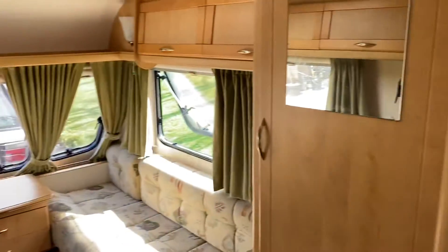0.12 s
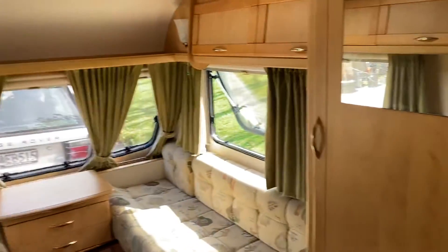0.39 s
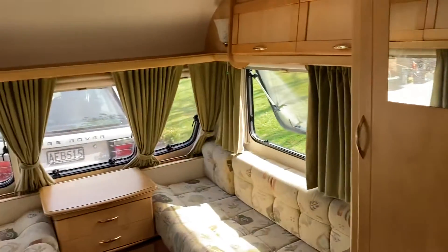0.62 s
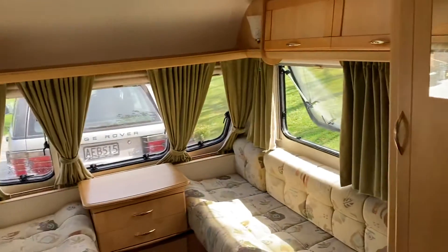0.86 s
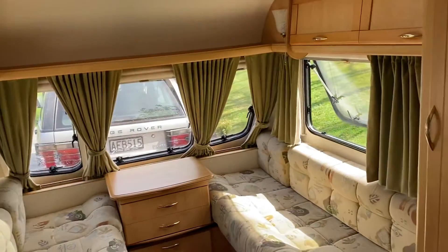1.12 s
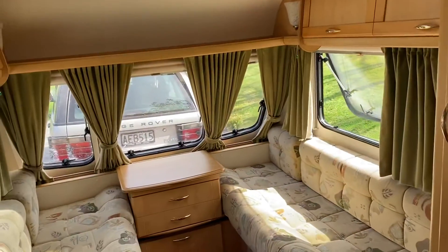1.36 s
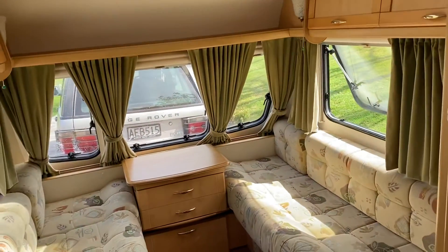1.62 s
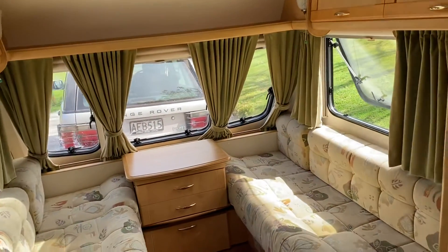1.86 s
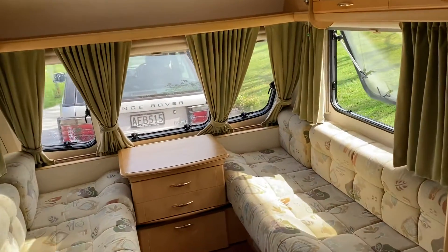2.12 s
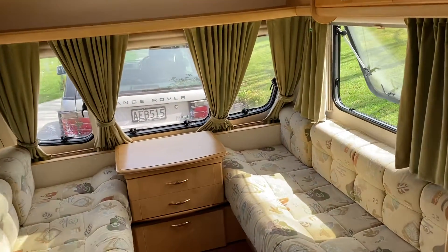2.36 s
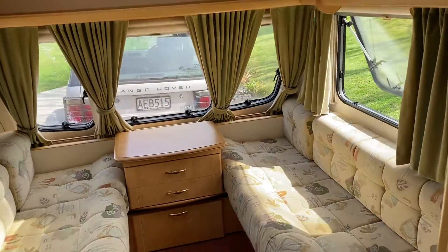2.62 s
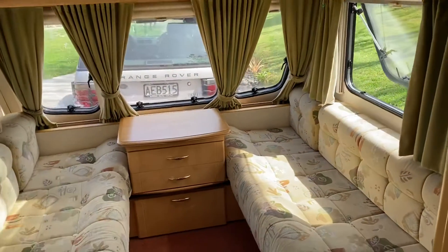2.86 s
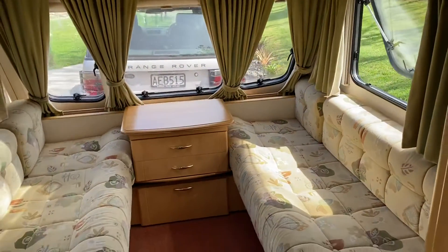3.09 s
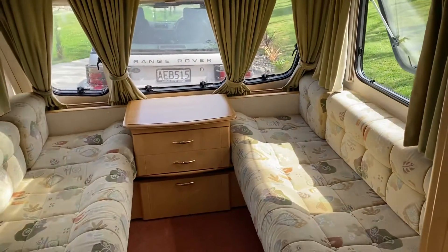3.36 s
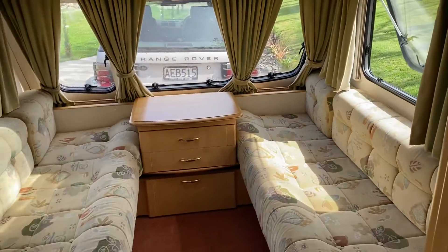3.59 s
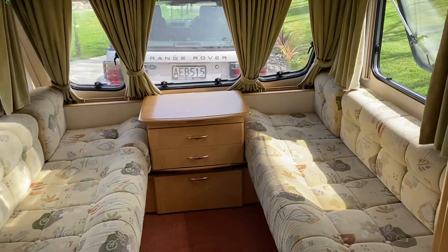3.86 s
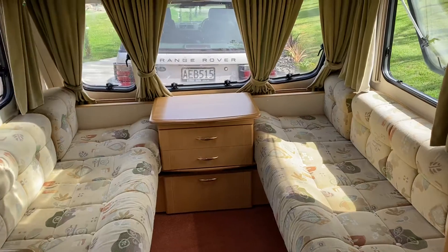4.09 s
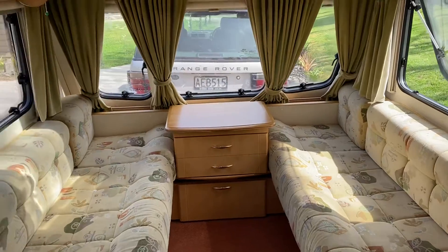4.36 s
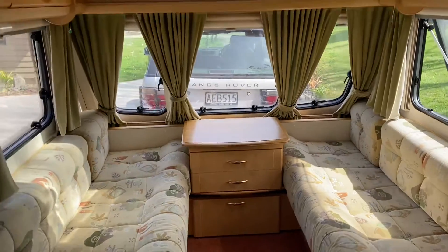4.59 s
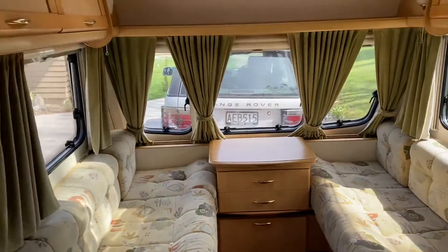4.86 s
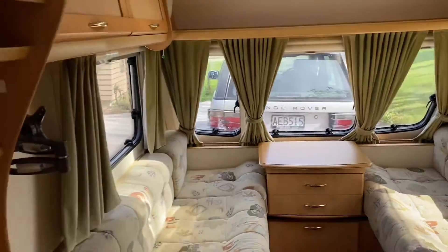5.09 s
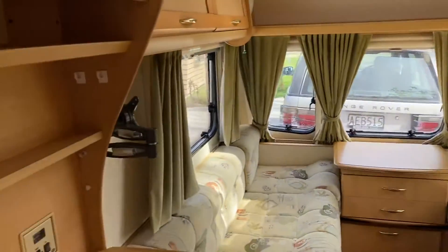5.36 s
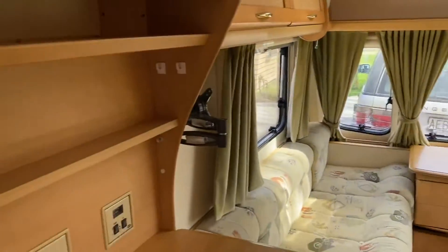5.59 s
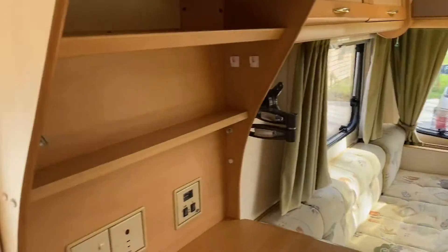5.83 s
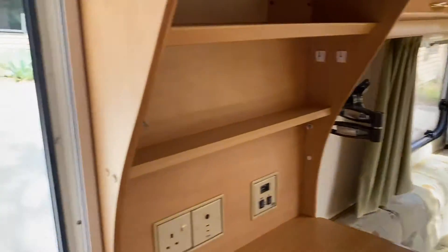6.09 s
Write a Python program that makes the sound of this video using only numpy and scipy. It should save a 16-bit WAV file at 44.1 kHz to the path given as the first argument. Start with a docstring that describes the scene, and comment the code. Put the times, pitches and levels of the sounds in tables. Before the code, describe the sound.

Close stereo microphone inside a small caravan. Light footsteps and small taps come first, with a few sharp latch clicks. Just before three seconds a light wooden door bangs shut, loud and hollow with a low thump. Bumps and rattles follow, then a second, weaker double knock about a second later and a few clicks. It settles to faint shuffling, two small taps, low outdoor rumble and a thin distant bird.

```python
"""You hear someone walk about in a small panelled caravan, shut a light door and work its latch.
Knocks and steps are bursts of rough force ringing tuned wood and panel modes; ticks are short decaying tones.
Cloth, soles and shuffling are coloured noise that follows the movement, with tiny contacts in the panels.
Outdoor rumble is low noise that booms in the cabin, over a faint hum; the bird is thin gliding tones.
Heavier blows add damped low swings, and short feedback delays make the cabin echo."""
import sys
import numpy as np
from scipy import signal
from scipy.fft import rfft, irfft, next_fast_len
from scipy.io import wavfile

SR = 44100
rng = np.random.default_rng(int(sys.argv[2]) if len(sys.argv) > 2 else 0)


def file_out(sig):
    """Save sig as 16-bit WAV at sys.argv[1]."""
    # one column per channel
    cols = np.atleast_2d(sig).T
    # limit, then scale
    lim = np.clip(cols, -1, 1)
    pcm = np.round(lim * 32767).astype(np.int16)
    wavfile.write(sys.argv[1], SR, pcm)


def amplitude_ratio(level_db):
    """Convert a level in decibels to the matching linear amplitude (field) ratio."""
    exponent = np.asarray(level_db, float) / 20
    return 10 ** exponent


N = 274071  # length in samples

# All spectra below give only the shape; the sound's own level sets the loudness.
# Shuffling, sole scuffs and cloth. Each row: pitch in Hz, level per Hz in dB.
SHUFFLE_SPECTRUM = [(180, -33), (300, -2.5), (982, -9), (1110, -7.5), (1420, -10.5), (1540, -11.5),
                    (3010, -29.5), (7000, -36), (9100, -67), (15400, -120)]
SCUFF_SPECTRUM = [(900, -28), (1600, -0.5), (2500, -2), (3600, -1.5), (5000, -5.5), (8000, -26.5)]
CLOTH_SPECTRUM = [(1200, -35), (2000, -7.5), (3500, -6), (5500, 1.5), (7000, -2), (9000, -1.5), (12000, -8),
                  (13000, -12), (15600, -7.5), (16000, -33)]
# Movement in the cabin. Each row: time in seconds, shuffle in dB, sole scuff in dB, cloth hiss in dB.
MOVEMENT_LEVELS = [(0, -69.5, -79.5, -94), (.3, -78, -81, -91), (.6, -65, -76, -91),
                   (.95, -67.5, -81, -78.5), (1.15, -82, -78, -101), (1.35, -59, -63.5, -75),
                   (1.55, -62, -68, -68.5), (1.85, -64.5, -70, -58.5), (2.1, -64.5, -69, -69.5),
                   (2.34, -65.5, -65.5, -60.5), (2.48, -69, -69.5, -70.5), (2.58, -64.5, -72, -81),
                   (2.7, -68, -67, -75), (3.05, -48, -61, -59.5), (3.24, -72, -81, -78.5),
                   (3.45, -53.5, -74, -84), (3.8, -54.5, -69, -75), (4.17, -62, -61, -65),
                   (4.3, -70, -78.5, -79.5), (5.03, -65, -78.5, -83.5), (5.065, -56, -70, -82),
                   (5.17, -54, -62, -91), (5.3, -61, -79, -88), (5.7, -67.5, -83, -88.5),
                   (6.21, -61, -68, -80)]
# Outdoor rumble. Each row: time in seconds, cabin boom in dB, drone in dB.
RUMBLE_LEVELS = [(0, -46.5, -57.5), (1.1, -46, -57), (1.3, -44, -52.5), (1.69, -48, -55.5),
                 (2.02, -43.5, -58), (2.3, -50.5, -59), (2.8, -44, -55), (4.3, -43, -57.5),
                 (4.67, -44.5, -55.5), (5.07, -44, -59), (5.59, -41, -54.5), (6.21, -42.5, -52.5)]
# Boom and drone. Each row: pitch in Hz, level per Hz in dB.
BOOM_SPECTRUM = [(13, -63.5), (22, -47.5), (27, -30.5), (41, -12.5), (64, 0.5), (79, -2), (103, -19),
                 (130, -18.5), (200, -41), (260, -64), (440, -120)]
DRONE_SPECTRUM = [(59, -23), (100, 1), (128, 1), (151, -5.5), (248, -10), (271, -12.5), (445, -15),
                  (592, -11), (1010, -22), (1390, -35), (3320, -57), (4730, -42), (7000, -67), (9100, -81),
                  (15400, -120)]
# A faint machine far off. Its one row: pitch in Hz, width in Hz, level in dB.
HUM_BAND = [(248, 13, -69.5)]
# Bird notes. Each row: start in seconds, length in seconds, first Hz, last Hz, level in dB before a shared trim.
BIRD_NOTES = [(0.188, 0.2, 5350, 5250, -81), (0.328, 0.43, 4580, 4770, -78), (.02, 0.14, 3650, 3600, -81),
              (0.444, 0.28, 3550, 3500, -81), (.84, 0.15, 4670, 4520, -75.5), (4.3, 0.14, 4630, 4550, -81),
              (4.62, 0.24, 4700, 4700, -74.5), (4.88, 0.57, 4570, 4580, -75),
              (5.15, 0.055, 4700, 4740, -81), (5.293, 0.052, 4800, 4780, -85),
              (5.418, 0.15, 4670, 4760, -82), (2.276, .1, 2950, 2980, -67), (2.36, 0.15, 3950, 3900, -70.5),
              (5.615, 0.2, 4750, 4360, -71.5), (5.74, 0.21, 4060, 3740, -75.5),
              (5.66, 0.12, 7100, 7000, -85), (5.925, 0.17, 4720, 4670, -75)]
# Knocks and steps. Each row: start in seconds, panel level in dB, pitch in Hz that the place of the blow
# favours, wood level in dB, crack level in dB, rattle decay by 60 dB in seconds.
# Each layer trims its level and divides the decay time.
BLOWS = [(0.265, -53, 708, -66, -66.5, 0.14), (0.459, -50, 725, -54, -62.5, 0.15),
         (0.786, -52, 1320, -56.5, -80, 0.18), (1.098, -43, 700, -51, -54, 0.43),
         (1.117, -41, 700, -34.5, -42, 0.11), (1.195, -42, 840, -52.5, -53.5, 0.2),
         (1.223, -42, 1070, -38, -67, 0.14), (1.279, -44, 1240, -51, -51.5, 0.28),
         (1.309, -50, 735, -50, -75, .1), (1.406, -40, 3180, -41, -45, 0.11),
         (1.495, -30, 2930, -41.5, -40.5, 0.078), (1.838, -45, 813, -58, -64, 0.086),
         (2.069, -53, 2820, -53.5, -46, 0.048), (2.156, -39, 2940, -58.5, -38, 0.16),
         (2.51, -43.5, 1340, -57, -65, 0.23), (2.798, -48.5, 1620, -60, -57.5, .33),
         (2.858, -45.5, 1080, -43.5, -77.5, 0.28), (2.886, -32, 1210, -32.5, -57, 0.095),
         (2.905, -20.5, 1340, -22, -46, .081), (2.91, -8, 1650, -15.5, -27, .1),
         (2.959, -21, 1530, -27.5, -40.5, 0.22), (2.995, -18, 1090, -34.5, -53, 0.077),
         (3.047, -28, 1120, -42.5, -70.5, .12), (3.075, -40, 1110, -49.5, -60, .33),
         (3.136, -34, 1170, -48.5, -70.5, 0.087), (3.203, -40.5, 1200, -45.5, -61.5, .099),
         (3.296, -43.5, 1700, -60, -68.5, 0.047), (3.349, -44.5, 1250, -45.5, -77, 0.08),
         (3.382, -32, 1460, -46, -53, 0.048), (3.443, -39, 1200, -31, -69, .11),
         (3.489, -39.5, 1100, -50.5, -63, 0.53), (3.561, -35, 1140, -52, -71, 0.24),
         (3.678, -38, 1150, -45, -64, 0.65), (3.713, -29.5, 1190, -34, -42, 0.21),
         (3.748, -45, 843, -46, -57, 0.054), (3.796, -46, 1660, -49.5, -52, 0.14),
         (3.861, -44.5, 1590, -44, -48.5, 0.11), (3.906, -17, 1200, -30, -34, 0.1),
         (3.915, -19.5, 1160, -19.5, -30.5, 0.12), (3.957, -40, 820, -38, -45, .14),
         (4.008, -34, 1110, -43, -66, .072), (4.082, -29, 1250, -41.5, -39, 0.17),
         (4.132, -26, 1460, -27, -35.5, .11), (4.189, -35, 1480, -60, -52.5, .054),
         (4.214, -39.5, 1450, -56, -53.5, 0.1), (4.535, -59, 1306, -75, -65, .08),
         (4.572, -56, 810, -52.5, -74, .085), (4.798, -33, 810, -36.5, -41.5, 0.084),
         (5.363, -28.5, 1713, -34.5, -38, 0.047)]
# Ringing of the door leaf. Each row: pitch in Hz, relative level in dB, decay by 60 dB in seconds.
WOOD_MODES = [(192.6, 5.5, 0.034), (237.6, -4, 0.067), (272.3, -1.5, 0.082), (332.3, 1.5, 0.081),
              (382.8, -3, 0.1), (423, -4, 0.091), (448, -2.5, 0.041), (519, -6, 0.044), (576, -4, 0.061),
              (700, -8.5, 0.043)]
# Ringing of thin panels and latch. Each row: pitch in Hz, relative level in dB, decay by 60 dB in seconds.
PANEL_MODES = [(767, 2, 0.066), (813, 1, 0.086), (990, 0, 0.017), (1070, 3, 0.077), (1200, 6, 0.013),
               (1320, 0.5, 0.057), (1460, 4.5, 0.023), (1590, 2.5, 0.066), (1680, 1.5, 0.027),
               (1960, -2, 0.014), (2004, -3.5, 0.18), (2310, -3.5, 0.029), (2430, -9, 0.022),
               (2620, -10, 0.086), (3016, -16, 0.025), (3255, -16, 0.01), (3600, -12.5, 0.039),
               (3950, -32, .025)]
# Crack of the knocks and sizzle of the ticks. Each row: pitch in Hz, level per Hz in dB.
CRACK_SPECTRUM = [(1500, -4.5), (2500, -1), (3600, -2), (5000, -6.5), (7000, -16), (9000, -18.5),
                  (12000, -48)]
SIZZLE_SPECTRUM = [(5000, -11.5), (8000, 0), (10000, -2.5), (12000, -4), (13500, -12.5), (15500, -18),
                   (16200, -33.5)]
# Hard ticks of latch and catches. Each row: start in seconds, level in dB before the trims of ring and snap,
# ring pitch in Hz, sizzle level in dB.
LATCH_TICKS = [(0.4603, -47.5, 5200, -67), (0.7826, -54, 3570, -92), (0.909, -53, 5000, -65),
               (1.117, -45, 2800, -53), (1.28, -37, 3000, -60), (1.406, -36, 3260, -61),
               (1.499, -25, 2770, -46.5), (2.07, -43.5, 2860, -74), (2.1565, -25.5, 2860, -52.5),
               (2.9044, -22.5, 2200, -36.5), (2.9118, -14, 2680, -41), (2.9164, -19.5, 2310, -51),
               (3.0465, -40.5, 2430, -54), (3.2046, -42, 2430, -59.5), (3.3498, -54, 9800, -70),
               (3.3847, -45, 6250, -75), (3.4476, -53, 6410, -61.5), (3.5389, -44.5, 6000, -80),
               (3.5608, -49, 6140, -80), (3.6775, -47.5, 6150, -65), (3.715, -28.5, 2830, -41.5),
               (3.8626, -38, 3770, -59), (3.891, -34.5, 10540, -44), (3.9089, -25.5, 2310, -43.5),
               (3.9393, -26.5, 2560, -35.5), (3.9588, -35.5, 2260, -39.5), (4.0074, -41, 2820, -59),
               (4.0836, -22, 2650, -46.5), (4.137, -27.5, 3750, -46), (4.5316, -45, 6600, -59.5),
               (4.797, -36.5, 2530, -47.5), (5.3642, -38, 2910, -44)]
# Damped swings of floor, shell and hollow boards. Each row: start in seconds, level in dB before a shared
# trim, pitch in Hz, decay by 60 dB in seconds.
LOW_SWINGS = [(1.116, -36, 165, 0.13), (1.128, -24.5, 87.8, 0.22), (1.5, -36.5, 479, .05),
              (2, -34, 64, 0.41), (2.167, -38, 172, 0.13), (2.918, -17.5, 141.7, 0.2),
              (2.929, -9.5, 55.7, 0.14), (2.972, -20, 164.7, 0.13), (3.24, -29, 63.6, .2),
              (3.459, -26.5, 65.1, 0.43), (3.491, -32.5, 108.5, 0.17), (3.741, -30, 195.5, .17),
              (3.914, -20, 132, 0.17), (3.921, -16, 57.1, 0.19), (3.986, -31.5, 44.6, 0.38),
              (4.138, -32.5, 150.2, 0.18), (4.803, -39.5, 332, 0.068), (5.365, -36.5, 470, 0.053),
              (5.372, -37, 71.3, 0.2)]
# How alike left and right are in the noises. Each row: pitch in Hz, likeness from -1 to 1.
SIDE_LIKENESS = [(60, 1), (180, 0.83), (550, 0.26), (1650, 0.043), (4970, 0.35), (15000, 0.71)]
# Near sounds at the two ports. Each row: pitch in Hz, radians by which left leads.
PORT_LEAD = [(0, 0.37), (700, -1.15), (1900, -0.45), (3300, 2), (4200, 0.95), (5000, 2), (6500, -0.96)]
# Microphone hiss. Each row: pitch in Hz, level per Hz in dB.
HISS_SPECTRUM = [(5000, -47), (7000, -6.5), (9000, -15), (11500, -22), (13000, -1.5), (14000, 5),
                 (15600, 1), (16000, -37)]

HISS_DB = -77.5
PATTER_PER_S, PATTER_DB, PATTER_SPREAD_DB = 120, -8.5, 4.0  # level is against the shuffle
# left-right balance while walking and at the door, its scatter from blow to blow, and that of the ticks
WALK_PAN_DB, DOOR_PAN_DB, PAN_SCATTER_DB, TICK_PAN_DB = -1, -3, 1.5, 2
DOOR_FROM_S, DOOR_UNTIL_S = 2.4, 4.05
TICK_T60_S, SNAP_T60_S = 0.011, 0.0036
SIZZLE_T60_S, SIZZLE_TAIL_DB, SIZZLE_TAIL_T60_S = 0.033, -14.5, 0.16
THUD_RISE_SHARE = 0.045  # rise time as a share of the decay time
# heavy blows shake the shell, whose rumble joins the boom and the drone
SHAKE_BOOM_DB, SHAKE_DRONE_DB, SHAKE_T60_S, SHAKE_RISE_S, SHELL_BELOW_HZ = -16.5, -26.5, 0.61, 0.03, 80
CABIN_T60_S, CABIN_DB, CABIN_FROM_HZ, WALL_CUT_HZ = 0.19, -13.5, 180, 13600
SHARED_FROM_HZ, SHARED_BY_HZ, TURN_FROM_HZ, TURN_HZ, TOP_HZ = 6200, 8200, 6500, 3750, 16300


def rms_one(x):
    """Scale to an average strength (rms) of 1."""
    return x / np.sqrt(np.mean(x ** 2) + 1e-20)


def pan(balance_db):
    """Left and right gains for a balance in dB; positive leans left."""
    return amplitude_ratio([[balance_db / 2], [-balance_db / 2]])


def in_time(rows):
    """Read each column of a timed table at every sample."""
    s, *columns = np.transpose(rows)
    return [np.interp(np.arange(N) / SR, s, column) for column in columns]


def at_hz(points, hz):
    """Read a spectrum on a logarithmic pitch axis."""
    table_hz, values = np.transpose(points)
    return np.interp(np.log(hz), np.log(table_hz), values)


def drift(rate_hz):
    """Slow random wandering with spread 1: white noise smoothed twice, at one value per 40 samples."""
    r = np.exp(-80 * np.pi * rate_hz / SR)
    white = rng.standard_normal(N // 40 + 2002)
    slow = signal.lfilter([1], [1, -2 * r, r * r], white)[2000:]  # drop the settling-in
    return np.interp(np.arange(N) / 40, np.arange(len(slow)), rms_one(slow - slow.mean()))


def colour(x, spectrum):
    """Filter white sound to a spectrum, keeping its power."""
    size = next_fast_len(N)
    gain = amplitude_ratio(at_hz(spectrum, np.fft.rfftfreq(size, 1 / SR) + 1))
    return irfft(rfft(x, size) * rms_one(gain), size)[..., :N]


def noise(spectrum):
    """Stereo noise of rms 1: a shared part and an opposed part, mixed to the likeness of each pitch."""
    size = next_fast_len(N)
    hz = np.fft.rfftfreq(size, 1 / SR) + 1
    alike = np.clip(at_hz(SIDE_LIKENESS, hz), -.99, .99)
    mid, side = rfft(rng.standard_normal((2, size)))
    both = np.sqrt(1 + alike) * mid + np.sqrt(1 - alike) * side * [[1], [-1]]
    return rms_one(irfft(both * amplitude_ratio(at_hz(spectrum, hz)), size)[:, :N])


def ring(forces, modes):
    """Each mode is a resonator that rings with its own share of the force, signs alternating."""
    out = 0
    for k, ((hz, level_db, t60), force) in enumerate(zip(modes, forces)):
        r = amplitude_ratio(-60 / (max(t60, .005) * SR))
        w = 2 * np.pi * hz / SR
        even = np.sqrt(4 * (1 - r) / len(modes))  # evens out long and short modes
        rung = signal.lfilter([0, np.sin(w)], [1, -2 * r * np.cos(w), r * r], force + 1e-18)
        out = out + (-1) ** k * even * amplitude_ratio(level_db) * rung
    return out


def rattle(s, level_db, t60, pan_db, rise_s):
    """Strength of all contacts over time: each rises quickly, then dies away, panned."""
    swell = np.zeros((2, N + SR))
    t = np.arange(SR // 4) / SR
    for start, peak_db, length_s, side_db in np.broadcast(s, level_db, t60, pan_db):
        shape = (1 - np.exp(-t / rise_s)) * amplitude_ratio(peak_db - 60 * t / max(length_s, .01))
        at = round(start * SR)
        swell[:, at:at + len(t)] += shape * pan(side_db)
    return swell[:, :N]


def impacts(grain_db, apart):
    """Rough force of uneven micro-impacts; the share called apart reaches each side on its own path."""
    white = np.sqrt(1 - apart) * rng.standard_normal(N) + np.sqrt(apart) * rng.standard_normal((2, N))
    grains = np.repeat(rng.standard_normal(N // 64 + 1), 64)[:N]
    return rms_one(white * amplitude_ratio(grain_db * grains))


def movement(shuffle_db, scuff_db, cloth_db):
    """Rubbing cloth and soles make noise whose level follows the movement and flutters."""
    shuffle = amplitude_ratio(shuffle_db + 1.5 * drift(20)) * noise(SHUFFLE_SPECTRUM)
    cloth = amplitude_ratio(cloth_db + 1.2 * drift(20)) * noise(CLOTH_SPECTRUM)
    scuff = amplitude_ratio(scuff_db + 1.5 * drift(25)) * noise(SCUFF_SPECTRUM)
    return shuffle + cloth + scuff


def patter(shuffle_db):
    """Tiny random contacts, as strong as the movement, ring in the panels."""
    born = rng.random(N) < PATTER_PER_S / SR
    size_db = PATTER_SPREAD_DB * np.minimum(rng.exponential(1, N), 4)
    pushes = born * amplitude_ratio(size_db) * rng.choice([-1, 1], N)
    dealt = rng.random((len(PANEL_MODES), N)) < .5  # each contact stirs about half the modes
    return amplitude_ratio(PATTER_DB + shuffle_db) * rms_one(ring(pushes * dealt, PANEL_MODES))


def boom(boom_db, shake):
    """Deep outdoor noise booms in the cabin, wavering, and swells while the shell shakes."""
    strength = amplitude_ratio(boom_db) + amplitude_ratio(SHAKE_BOOM_DB) * shake
    return strength * amplitude_ratio(1.5 * drift(8)) * noise(BOOM_SPECTRUM)


def drone(drone_db, shake):
    """Outdoor noise reaching higher than the boom, also fed by the shaking shell."""
    return (amplitude_ratio(drone_db) + amplitude_ratio(SHAKE_DRONE_DB) * shake) * noise(DRONE_SPECTRUM)


def hum():
    """A narrow band of noise makes a soft hum whose level wanders."""
    (hz, width_hz, level_db), = HUM_BAND
    band = signal.butter(2, [hz - width_hz / 2, hz + width_hz / 2], "band", fs=SR, output="sos")
    return amplitude_ratio(level_db + 1.1 * drift(1.0)) * rms_one(signal.sosfilt(band, rng.standard_normal(N)))


def bird():
    """Thin distant notes glide in pitch, blurred by a fast tremble in pitch and level."""
    out = np.zeros(N + SR)
    tremble, flicker = np.resize(drift(120), N + SR), np.resize(drift(30), N + SR)
    for s, length_s, first_hz, last_hz, level_db in BIRD_NOTES:
        at = round(s * SR)
        u = np.linspace(0, 1, round(length_s * SR))
        note = slice(at, at + len(u))
        hz = (first_hz + (last_hz - first_hz) * u) * (1 + 0.0152 * tremble[note])
        swell = np.sqrt(np.sin(np.pi * u) + 1e-9) * amplitude_ratio(level_db - 1.0 + 4.0 * flicker[note])
        out[note] += swell * np.sin(2 * np.pi * np.cumsum(hz) / SR)
    song = out[:N]
    return np.array([song, np.roll(song, 2)]) * pan(3)  # right is two samples later


def knocks(grit_high):
    """Each blow is a rough force that rings wood slowly and panels sooner, with a crack on top."""
    s, panel_db, favoured_hz, wood_db, crack_db, t60 = np.transpose(BLOWS)
    # every blow strikes the modes anew
    luck = rng.standard_normal((len(WOOD_MODES) + len(PANEL_MODES) + 1, len(BLOWS)))
    at_door = (s > DOOR_FROM_S) & (s < DOOR_UNTIL_S)
    pan_db = np.where(at_door, DOOR_PAN_DB, WALK_PAN_DB) + PAN_SCATTER_DB * luck[len(PANEL_MODES)]

    grit_low = impacts(grain_db=2.5, apart=0.12)
    wood = []
    for k in range(len(WOOD_MODES)):
        level_db = wood_db + 4.0 + 3.1 * luck[-1 - k]
        wood.append(grit_low * rattle(s, level_db, t60 / 0.98, pan_db, rise_s=0.0014))

    grit_mid = impacts(grain_db=4.5, apart=0.61)
    panel = []
    for k, (hz, *_) in enumerate(PANEL_MODES):
        # modes away from the favoured pitch are weaker, steeply at first
        octaves = abs(np.log2(hz / favoured_hz))
        level_db = panel_db - 1.0 - 30.3 * np.minimum(octaves, .2) - 1.8 * octaves + 2 * luck[k]
        panel.append(grit_mid * rattle(s, level_db, t60 / 1.256, pan_db, rise_s=0.0007))

    crack = grit_high * rattle(s, crack_db + 2.0, t60 / 1.02, pan_db, rise_s=0.0012)
    return ring(wood, WOOD_MODES) + ring(panel, PANEL_MODES) + colour(crack, CRACK_SPECTRUM)


def ticks():
    """Each hard touch makes a broad snap and a brief ring of the small part that was hit."""
    out = np.zeros((2, N + SR))
    t = np.arange(SR // 10) / SR
    for s, peak_db, hz, _ in LATCH_TICKS:
        tone = amplitude_ratio(-4.5 - 60 * t / TICK_T60_S) * np.sin(2 * np.pi * hz * t)
        # differences of white noise are bright
        snap = amplitude_ratio(-18.0 - 60 * t / SNAP_T60_S) * np.diff(rng.standard_normal(len(t)), prepend=0)
        at = round(s * SR)
        out[:, at:at + len(t)] += amplitude_ratio(peak_db) * (tone + snap) * pan(TICK_PAN_DB)
    return out[:, :N]


def sizzle(grit_high):
    """High rough noise on every tick: a quick burst and a weaker, longer tail."""
    s, _, _, level_db = np.transpose(LATCH_TICKS)
    burst = rattle(s, level_db, SIZZLE_T60_S, 0, rise_s=.0003)
    tail = rattle(s, level_db + SIZZLE_TAIL_DB, SIZZLE_TAIL_T60_S, 0, rise_s=0.0045)
    return colour(grit_high * (burst + tail), SIZZLE_SPECTRUM)


def thuds():
    """Floor and shell answer the heavier blows with damped low swings."""
    out = np.zeros(N + SR)
    t = np.arange(SR // 2) / SR
    for s, peak_db, hz, t60 in LOW_SWINGS:
        rise = (1 - np.exp(-t / (THUD_RISE_SHARE * t60))) ** 2
        at = round(s * SR)
        out[at:at + len(t)] += rise * amplitude_ratio(peak_db + 5.5 - 60 * t / t60) * np.sin(2 * np.pi * hz * t)
    return out[:N] * pan(-1.2)


def shaking():
    """How hard the shell still shakes after its lowest swings: a rise, then a slow decay."""
    out = np.zeros(N)
    t = np.arange(N) / SR
    for s, peak_db, hz, _ in LOW_SWINGS:
        since = np.maximum(t - s, 0)
        rise = 1 - np.exp(-since / SHAKE_RISE_S)
        out += (hz < SHELL_BELOW_HZ) * rise * amplitude_ratio(peak_db - 60 * since / SHAKE_T60_S)
    return out


def cabin(x):
    """Walls throw sound back and forth: eight short feedback delays a side, duller on every round."""
    size = next_fast_len(N + SR)
    hz = np.fft.rfftfreq(size, 1 / SR)
    spectrum, out = rfft(x, size), []
    for lags_s in rng.uniform(.005, .017, (2, 8)):
        echoes = 0
        for k, lag in enumerate(lags_s):
            wall = amplitude_ratio(-60 * lag / CABIN_T60_S) / (1 + 1j * hz / WALL_CUT_HZ)
            loop = wall * np.exp(-2j * np.pi * hz * lag)
            echoes = echoes + (-1) ** k * loop / (1 - loop)  # the sum of all rounds
        out.append(irfft(spectrum * echoes, size)[:N])
    return np.array(out)


def ports(x):
    """Two ports on one body hear a near sound with a phase difference that depends on pitch."""
    size = next_fast_len(N + 4096)
    lead = np.interp(np.fft.rfftfreq(size, 1 / SR), *np.transpose(PORT_LEAD))
    return irfft(rfft(x, size) * np.exp(.5j * lead * [[1], [-1]]), size)[:, :N]


def scene():
    """Knocks and ticks ring in the cabin over movement, rumble, hum and bird."""
    shuffle_db, scuff_db, cloth_db = in_time(MOVEMENT_LEVELS)
    boom_db, drone_db = in_time(RUMBLE_LEVELS)
    shake = shaking()
    outdoors = boom(boom_db, shake) + drone(drone_db, shake) + hum() + bird()
    grit_high = impacts(grain_db=1.5, apart=.6)  # one rough force for crack and sizzle
    hits = knocks(grit_high) + ticks() + sizzle(grit_high)
    near = ports(hits + patter(shuffle_db) + thuds())
    # the cabin is too small to scatter the lowest notes
    high_pass = signal.butter(2, CABIN_FROM_HZ, "high", fs=SR, output="sos")
    echo = amplitude_ratio(CABIN_DB) * cabin(signal.sosfilt(high_pass, hits.mean(axis=0)))
    return near + echo + movement(shuffle_db, scuff_db, cloth_db) + outdoors


def top_cut(x):
    """Nothing passes above the cut-off."""
    return signal.sosfilt(signal.butter(12, 16510, fs=SR, output="sos"), x)


def record(dry):
    """Adds hiss; the treble is nearly one shared signal whose left-right phase turns once every TURN_HZ."""
    size = next_fast_len(N + 4096)
    hz = np.fft.rfftfreq(size, 1 / SR)
    sides = rfft(dry + amplitude_ratio(HISS_DB) * noise(HISS_SPECTRUM), size)
    shared = np.clip((hz - SHARED_FROM_HZ) / (SHARED_BY_HZ - SHARED_FROM_HZ), 0, .97)
    sides[1] = np.sqrt(1 - shared ** 2) * sides[1] + shared * sides[0]
    turn = -2 * np.pi * np.maximum(hz - TURN_FROM_HZ, 0) / TURN_HZ
    turned = sides * (hz < TOP_HZ) * np.exp(.5j * turn * [[1], [-1]])
    mix = irfft(turned, size)[:, :N]
    return top_cut(mix)


dry = scene()
out = record(dry)
file_out(out)
```